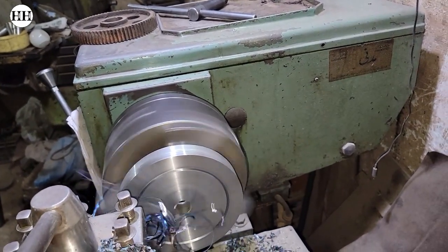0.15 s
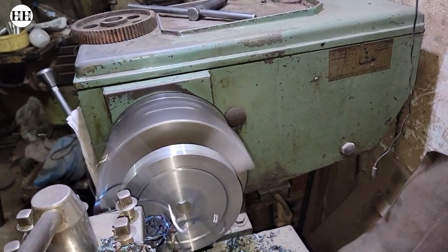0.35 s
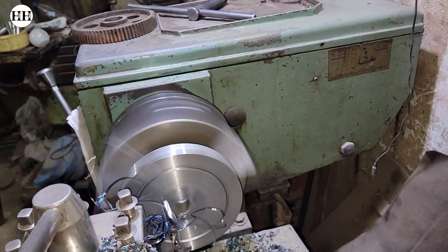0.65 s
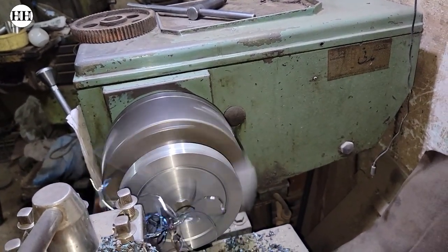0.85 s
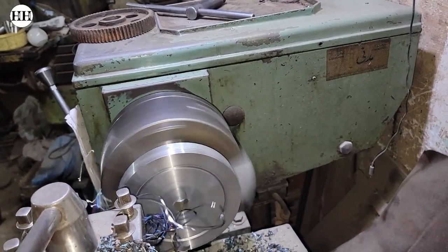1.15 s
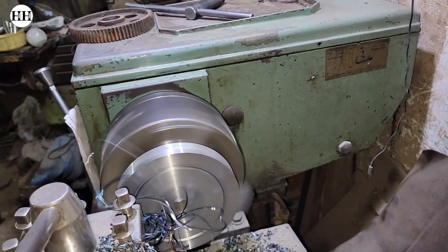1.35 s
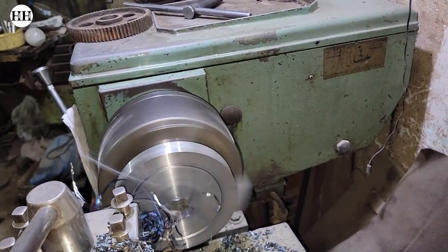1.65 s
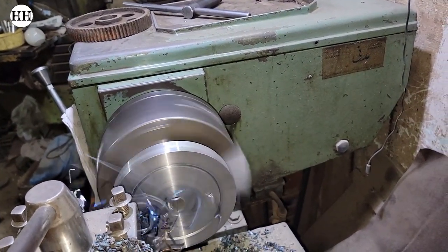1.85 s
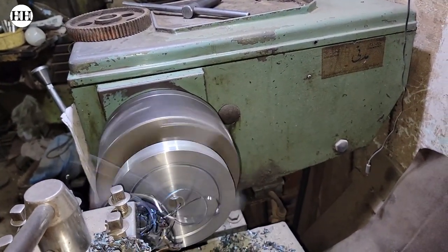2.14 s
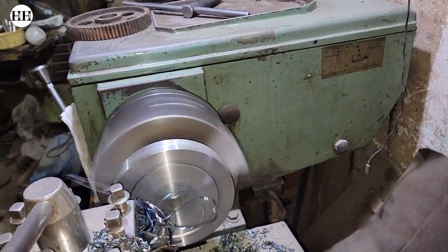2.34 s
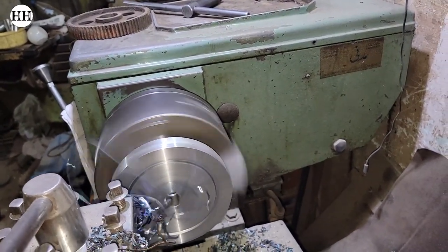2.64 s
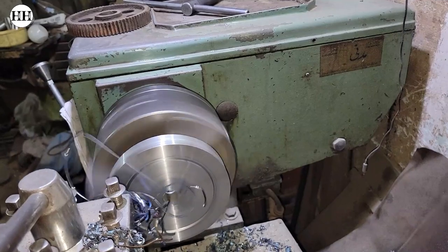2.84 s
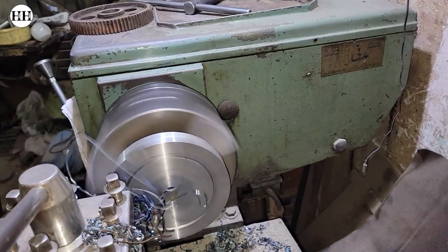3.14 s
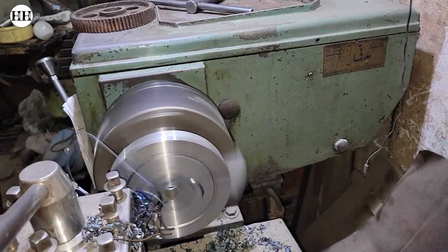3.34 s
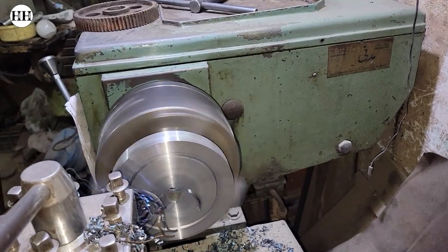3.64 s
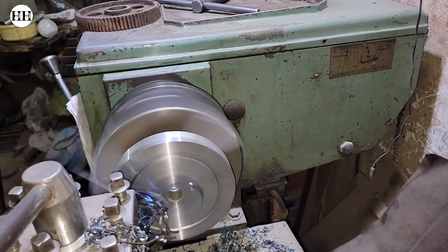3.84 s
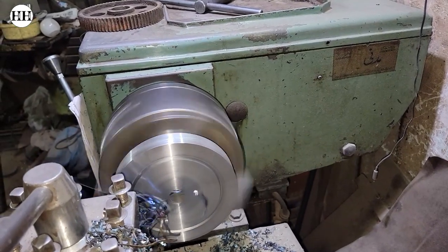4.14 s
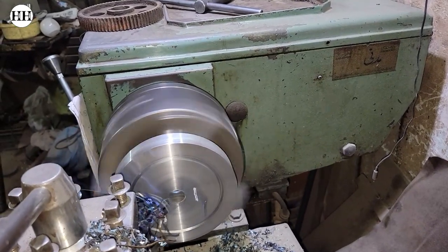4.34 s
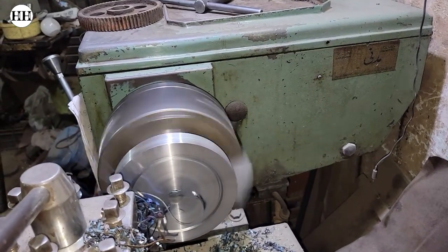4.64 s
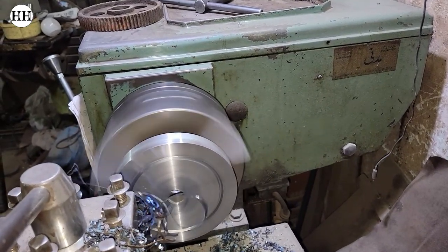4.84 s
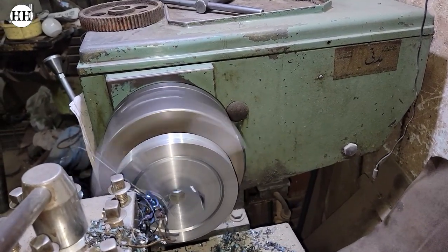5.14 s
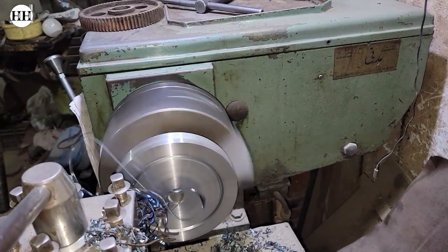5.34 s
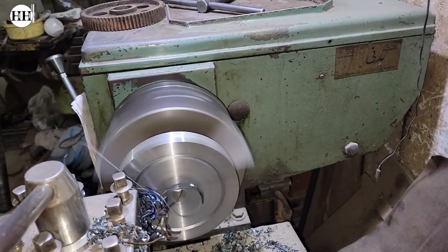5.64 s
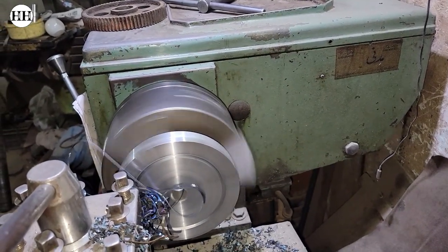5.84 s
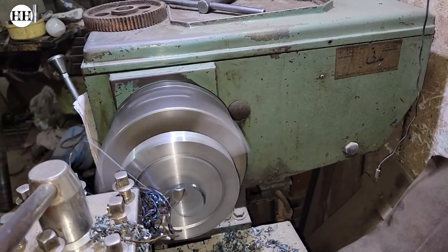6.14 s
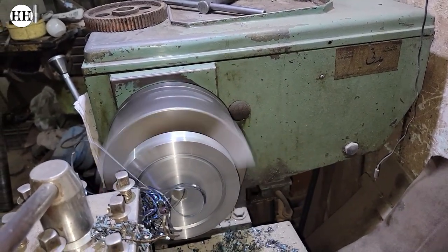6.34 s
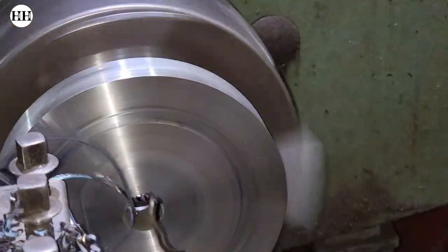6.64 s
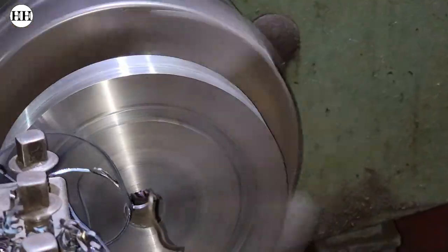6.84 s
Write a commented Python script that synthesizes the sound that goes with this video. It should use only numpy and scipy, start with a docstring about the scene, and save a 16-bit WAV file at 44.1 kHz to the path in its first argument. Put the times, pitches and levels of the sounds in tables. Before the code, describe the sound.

A lathe tool faces a spinning steel disc, heard closely in stereo with a short, dense workshop echo. From 0 s a harsh squeal around 4.5 kHz, with bright overtones, wobbles rapidly in pitch and level above low motor rumble, soft casing booms and a thin wavering gear whine near 3 kHz. It weakens unevenly, with a sharp spurt near 1.6 s. From 2 to 3.8 s it becomes a faint, rough tone while chip hiss, sizzle and gear noise swell; a tiny snap ticks at 3.3 s. It almost dies by 4.2 s, then shrieks back abruptly at 4.3 s, strongest, as the machine noise drops. Another tick comes near 5 s. After 5.6 s, with a low boom, the squeal breaks into gaps and chirps, one strong at 6.2 s. At about 6.5 s gearbox noise, hiss and sizzle jump louder until the end at 7 s, the squeal faint.

```python
"""A lathe tool facing a steel disc chatters in a wandering high squeal: a self-excited vibration of three
locked partials, which beats against its own echoes from bed and walls. The chip hisses and sizzles as
noise and sets the disc ringing; two snaps tick. Gears whine and drone as a wavering tone, noise and driven
resonances; motor and bed rumble below. Near the end gearbox noise, hiss and sizzle step up at once.
Two close microphones hear it, the left a little later."""
import sys
import numpy as np
from scipy import signal
from scipy.fft import rfft, irfft
from scipy.io import wavfile
from scipy.ndimage import uniform_filter1d

SR = 44100
rng = np.random.default_rng(int(sys.argv[2]) if len(sys.argv) > 2 else 0)


def int16_out(signal):
    """Quantize to a 16-bit WAV file."""
    q = np.round(np.clip(np.atleast_2d(signal).T, -1, 1) * 32767)
    wavfile.write(sys.argv[1], SR, q.astype(np.int16))


def boost(x):
    """Linear amplitude factor 10**(x/20) for a level x in decibels (scalar or array-like)."""
    u = np.asarray(x, float) / 20
    return 10 ** u


N = 307813   # length in samples
LEFT_LAG_S = .000385   # the machine is nearer to the right microphone


def rms_one(x):
    """Normalisation of a signal to unit root-mean-square."""
    return x / np.sqrt(np.mean(x ** 2) + 1e-20)


def in_time(rows):
    """Linear interpolation of every column after the time column, one value a sample."""
    s, *columns = np.transpose(rows)
    return [np.interp(np.arange(N) / SR, s, c) for c in columns]


def at_hz(points, hz):
    """Interpolation of a spectrum on a logarithmic frequency axis."""
    freqs, values = np.transpose(points)
    return np.interp(np.log(hz), np.log(freqs), values)


def drift(rate_hz):
    """Random modulation: low-passed noise of unit rms, its double real pole at rate_hz."""
    r = np.exp(-40 * np.pi * rate_hz / SR)   # one step is 20 samples
    noise = rng.standard_normal(N // 20 + 4002)
    slow = signal.lfilter([1], [1, -2 * r, r * r], noise)[4000:]   # settled part
    return np.interp(np.arange(N) / 20, np.arange(len(slow)), rms_one(slow))


def bumps(rows):
    """Superposition of flat-topped swells, each row (centre s, half length s, height)."""
    t = np.arange(N) / SR
    return sum(height * np.exp(-((t - s) / half_s) ** 4) for s, half_s, height in rows)


def two_ears(shared, own, hz):
    """Partial coherence: a shared part, later on the left, plus an independent part at each microphone."""
    # Each row: frequency in hertz, share of the power common to left and right (0 to 1).
    likeness = [(40, 0.89), (130, 1), (290, 0.46), (640, 0.69), (2000, 0.28), (5000, 0.043), (15000, 0.067)]
    alike = np.clip(at_hz(likeness, hz), 0, 1)
    common = np.array([np.roll(shared, round(LEFT_LAG_S * SR)), shared])
    return np.sqrt(alike) * common + np.sqrt(1 - alike) * own


def banded_noise(spectrum, patchy_db, rate_hz, per_octave=3):
    """Subband synthesis: narrow bands of stereo noise with common and separate flicker; total rms 1."""
    lowest, highest = spectrum[0][0], spectrum[-1][0]
    count = int(per_octave * np.log2(highest / lowest))
    edges = np.geomspace(lowest, min(highest, .45 * SR), count + 1)
    out, together = 0, drift(rate_hz)
    white = rng.standard_normal((2, 3, N))   # neighbouring bands take unrelated noise
    for k, (low, high) in enumerate(zip(edges, edges[1:])):
        band_pass = signal.butter(2, [low, high], "band", fs=SR, output="sos")
        band = signal.sosfilt(band_pass, white[k % 2])
        hz = np.sqrt(low * high)
        gain_db = at_hz(spectrum, hz) + patchy_db * (together + 3.06 * drift(35))
        out = out + boost(gain_db) * two_ears(band[0], band[1:], hz)
    return rms_one(out)


def rings(modes, throb_db):
    """Noise-driven resonance: noise twice through each narrow mode gives a rough, wavering tone."""
    out = 0
    for hz, width_hz, level_db in modes:
        r = np.exp(-np.pi * width_hz / SR)
        section = [1, 0, -1, 1, -2 * r * np.cos(2 * np.pi * hz / SR), r * r]
        tone = rms_one(signal.sosfilt([section, section], rng.standard_normal((3, N))))
        out = out + boost(level_db + throb_db * drift(8.9)) * two_ears(tone[0], tone[1:], hz)
    return out


def boom_envelope():
    """Amplitude envelope of the casing's booms."""
    # Each row: centre in seconds, half length in seconds, level in dB.
    boom_rows = [(0.0, 0.17, -41), (0.84, 0.47, -36), (3.677, 0.083, -40), (4.0, .07, -42),
                 (5.655, 0.077, -28.5), (6.845, .1, -37)]
    return bumps([(s, half_s, boost(db)) for s, half_s, db in boom_rows])


def rumble(booms):
    """Low broadband vibration of motor and bed, with two modes of the bed driven by noise."""
    # Each row: frequency in hertz, relative level in dB per hertz.
    rumble_spectrum = [(15, -48), (25, -26), (86, 1), (144, -11.5), (253, -6), (318, -5), (461, -7.5),
                       (598, -9), (648, -16.5), (1090, -9.5), (1200, -20), (1560, -58), (2640, -120)]
    # Each row: frequency in hertz, width in hertz, level in dB re the noise.
    bed_modes = [(55.5, 5, -7), (103.5, 23, -5)]
    noise = banded_noise(rumble_spectrum, patchy_db=0.66, rate_hz=7.1)
    return (boost(-37) + .45 * booms) * (noise + rings(bed_modes, throb_db=1.0))


def drone(booms):
    """Forced resonance of the casing: its modes swell in booms and hold steady for a while."""
    # Each row: frequency in hertz, width in hertz, relative level in dB.
    casing_modes = [(126.3, 55, -10), (214, 22, -7.5), (249.7, 12, -2), (286, 13, -8.5)]
    # Steady stretch: start in seconds, end in seconds, level in dB.
    steady = (4.0, 5.7, -39)
    from_s, to_s, held_db = steady
    t = np.arange(N) / SR
    held = boost(held_db) * (t > from_s) * (t < to_s)
    return np.maximum(boost(-43) + booms, held) * rings(casing_modes, throb_db=2.6)


def gearbox(level_db):
    """Structure-borne gear noise: shaped broadband noise and the gears' driven resonances."""
    # Each row: frequency in hertz, relative level in dB per hertz.
    gear_spectrum = [(88, -48), (150, -18), (247, -1.5), (336, -24.5), (542, -1), (622, -7.5), (846, -2),
                     (1860, -8), (2960, -11.5), (4940, -39), (9000, -77), (11700, -62), (19800, -120)]
    # Each row: frequency in hertz, width in hertz, level in dB re the noise.
    gear_modes = [(552.2, 25, -13), (882, 19, -13), (1337, 85, -12), (2259, 210, -14), (3822, 16, -13)]
    noise = banded_noise(gear_spectrum, patchy_db=0.76, rate_hz=48)
    return boost(level_db) * (noise + rings(gear_modes, throb_db=2.5))


def whine(level_db, chatter_db):
    """Gear-mesh tone, frequency and amplitude modulated by wheel run-out, with a phase drift on each path."""
    mesh_hz, waver_hz, throb_db = 2988, 8, 3.0
    # below -24 dB of chatter the unloaded gears whine louder, by up to 6.5 dB
    unloaded_db = 6.5 * np.clip((-24 - chatter_db) / 10, 0, 1)
    phase = 2 * np.pi * np.cumsum(mesh_hz + waver_hz * drift(22.9)) / SR
    paths = np.array([np.sin(phase + drift(15.0)) for path in range(3)])
    return boost(level_db + unloaded_db + throb_db * drift(22)) * two_ears(paths[0], paths[1:], mesh_hz)


def sizzle(level_db, third_partial_db):
    """Turbulent treble noise of the chip, plus the noisy part of the third partial's cutting force."""
    # Each row: frequency in hertz, relative level in dB per hertz.
    sizzle_spectrum = [(6000, -15.5), (8000, -2), (10500, -13.5), (11800, 0), (13200, 9), (15500, -1.5)]
    torn = boost(third_partial_db - 12)
    return (boost(level_db) + torn) * banded_noise(sizzle_spectrum, patchy_db=.45, rate_hz=14, per_octave=6)


def chip_hiss(level_db, chatter_db):
    """Broadband noise of the chip leaving the edge, with the disc's modes excited by noise."""
    # Each row: frequency in hertz, relative level in dB per hertz.
    chip_spectrum = [(2500, -9.5), (3300, -4), (4200, 1.5), (4600, -7.5), (4950, -6), (5250, -13),
                     (6500, -11), (7600, -16.5)]
    # Each row: frequency in hertz, width in hertz, level in dB re the hiss under full chatter.
    disc_modes = [(4185, 30, -14), (4320, 30, -14), (4400, 30, -14), (4515, 25, -10), (4605, 25, -9),
                  (4695, 25, -13), (4770, 16, -14)]
    hiss = banded_noise(chip_spectrum, patchy_db=.9, rate_hz=14, per_octave=8)
    shaken = boost(np.minimum(chatter_db + 27, 0))   # the disc rings less once the chatter dies
    return boost(level_db) * (hiss + shaken * rings(disc_modes, throb_db=3.0))


def ticks():
    """Impulsive fracture: each snap of a chip is high-passed noise with exponential decay."""
    # Each row: start in seconds, initial noise level in dB before the high-pass.
    snaps = [(3.3238, -18.5), (4.98, -18.5)]
    out, t = np.zeros((2, N)), np.arange(N) / SR
    for s, start_db in snaps:
        decay = (t >= s) * np.exp(-np.abs(t - s) / .012)   # time constant in s
        out += boost(start_db) * decay * rng.standard_normal((2, N))
    return signal.sosfilt(signal.butter(2, 10000, "high", fs=SR, output="sos"), out)


def layer_levels():
    """Level envelopes in dB of gearbox, whine, chip and sizzle: sinking, fixed final levels, and flares."""
    # Each row: time in seconds, sinking in dB.
    sink_rows = [(0.0, 11.5), (0.35, 14.5), (0.55, 8.5), (0.95, 10.5), (1.3, 9), (1.7, 4.5), (2.8, 0),
                 (4.28, 0.5), (4.35, 12.5), (5.55, 13.5), (5.8, 9.5), (6.22, 7), (6.48, 5)]
    # Each row: centre of a flare in seconds, half length in seconds, rise of the chip hiss in dB.
    spurts = [(0.96, 0.25, 5.5), (1.34, 0.044, 5), (1.59, .05, 4.5), (4.28, 0.032, 5.5), (5.64, 0.025, 3.5),
              (6.22, 0.063, 2.5)]
    # Levels in dB held after the step: gearbox, whine, chip, sizzle.
    final_levels = (-23.5, -41.5, -25.5, -29)
    step_s = 6.478
    # for each layer: level in dB when not sunk, share of the sinking, share of the flares
    layers = [(-27.5, 1.105, 0.54), (-35.5, 1.15, 0), (-27, 1, 1), (-34, 1, .9)]
    t, sink_db, flare_db = np.arange(N) / SR, in_time(sink_rows)[0], bumps(spurts)
    return [np.where(t < step_s, db - sink_share * sink_db, final_db) + flare_share * flare_db
            for (db, sink_share, flare_share), final_db in zip(layers, final_levels)]


def workshop(x):
    """Reverberation: bed and walls return a dense tail of even colour, a different one at each microphone."""
    t60_s = .35
    t = np.arange(SR // 2) / SR
    tail = rfft(rng.standard_normal((2, len(t))) * boost(-60 * t / t60_s) * (t > .002))
    smooth_power = uniform_filter1d(np.abs(tail) ** 2, size=25, axis=1)
    tail = irfft(tail / np.sqrt(smooth_power), len(t))
    lead = np.concatenate([x[SR // 4:0:-1], x])   # the squeal was sounding before
    return signal.fftconvolve(lead[None], tail, axes=1)[:, SR // 4:SR // 4 + N]


def chatter():
    """Self-excited vibration: its pitch and level, and each partial's level re the first."""
    # Each row: time in seconds, pitch in hertz, level in dB.
    squeal_rows = [(0.0, 4548, -15.5), (0.09, 4462, -14), (0.18, 4598, -13), (0.23, 4555, -17),
                   (0.28, 4604, -12.5), (0.37, 4455, -17), (0.45, 4495, -15), (0.49, 4446, -23.5),
                   (0.67, 4495, -17.5), (0.76, 4470, -18.5), (0.82, 4680, -18), (0.89, 4477, -16),
                   (0.97, 4514, -19.5), (1.08, 4517, -18), (1.14, 4510, -19), (1.24, 4660, -16.5),
                   (1.34, 4600, -23.5), (1.42, 4580, -23.5), (1.47, 4690, -18), (1.53, 4585, -24),
                   (1.59, 4462, -10.5), (1.67, 4610, -36), (1.7, 4650, -15), (1.83, 4467, -19.5),
                   (1.93, 4617, -19), (1.98, 4480, -21), (2.12, 4560, -21), (2.21, 4440, -26.5),
                   (2.34, 4545, -21.5), (2.45, 4546, -25.5), (2.98, 4554, -25.5), (3.56, 4585, -24.5),
                   (3.75, 4620, -27), (3.85, 4550, -37.5), (4.24, 4860, -49), (4.27, 4720, -26),
                   (4.288, 4750, -5.5), (4.34, 4580, -8.5), (4.44, 4628, -11.5), (4.59, 4548, -11),
                   (4.67, 4657, -13), (4.7, 4600, -9.5), (4.78, 4602, -14.5), (4.82, 4568, -13.5),
                   (4.97, 4512, -13), (5.06, 4552, -11.5), (5.12, 4455, -15.5), (5.19, 4520, -13.5),
                   (5.35, 4430, -16), (5.43, 4571, -13.5), (5.57, 4533, -16), (5.65, 4544, -22),
                   (5.73, 4537, -23), (5.81, 4790, -23), (5.88, 4550, -36), (5.97, 4720, -29),
                   (6.06, 4660, -42.5), (6.12, 4642, -20.5), (6.2, 4605, -13), (6.27, 4590, -30),
                   (6.35, 4570, -34.5), (6.41, 4630, -20), (6.47, 4556, -18.5), (6.52, 4620, -37),
                   (6.98, 4580, -28)]
    # How hard the edge grabs, at the usual pitch.
    # Each row: time in seconds, second partial in dB re the first, third partial in dB re the first.
    overtones = [(0.0, -4, -4), (0.4, -4, -9.5), (0.702, -10, -15), (1.101, -11, -18), (1.6, -14.5, -21),
                 (2.3, -21.5, -25), (4.269, -15.5, -8), (4.4, -14.5, -10.5), (5.351, -11, -14),
                 (5.6, -14.5, -18), (5.8, -19.5, -31.5), (6.98, -11.5, -32)]
    # Change of second and third partial in dB per 100 hertz of pitch above the usual.
    fade_per_100_hz = [-6.5, -3]
    usual_hz, wander_hz = 4530, 10
    pitch_hz, level_db = in_time(squeal_rows)
    pitch_hz = pitch_hz + wander_hz * drift(12.53)
    above = np.clip((pitch_hz - usual_hz) / 100, -1, 1.5)
    overtones_db = [db + fade * above for db, fade in zip(in_time(overtones), fade_per_100_hz)]
    return pitch_hz, level_db, [0] + overtones_db


def squeal(pitch_hz, level_db, partials_db):
    """Phase-locked harmonics of the chatter: each partial reaches the microphones directly and by echoes."""
    # Left minus right of each partial in dB: the tool beams them differently.
    partial_pan_db = [-1, 12, -1]
    # Echo of each partial in dB re its direct sound, by how the tool beams it.
    partial_echo_db = [3, -6, -3]
    jitter_hz, flutter_db, rasp = 23, 1.8, .18
    # the weaker the chatter, the more the cutting force knocks its pitch about, until it is a rough band
    lately_db = np.maximum(level_db, uniform_filter1d(level_db, size=SR // 5))
    knocked_hz = np.minimum(5 * boost(-5 * np.minimum(lately_db + 19, 0)), 200)
    shaken_hz = pitch_hz + jitter_hz * drift(71.9) + knocked_hz * drift(214)
    phase = 2 * np.pi * np.cumsum(shaken_hz) / SR
    flutter, direct, echoed = flutter_db * drift(40.0), 0, 0
    for k, rel_db in enumerate(partials_db):
        grit = 1 + rasp * drift(220)   # the chip tears in small jerks: noisy skirts round each partial
        share_db = -10 * np.log10(1 + boost(2 * partial_echo_db[k]))   # direct part of the whole level
        # 3 dB turns rms into sine amplitude; higher partials flutter more
        gain = boost(level_db + rel_db + share_db + 3 + (1 + k / 2) * flutter)
        partial = gain * grit * np.sin((k + 1) * phase)
        direct = direct + partial * boost(partial_pan_db[k] / 2 * np.array([[1], [-1]]))
        echoed = echoed + partial * boost(partial_echo_db[k])
    delayed = np.array([np.roll(direct[0], round(LEFT_LAG_S * SR)), direct[1]])
    return delayed + workshop(echoed)


def scene():
    """Superposition of all sources, the machine layers 1.6 dB louder on the right."""
    pitch_hz, chatter_db, partials_db = chatter()
    gearbox_db, whine_db, chip_db, sizzle_db = layer_levels()
    booms = boom_envelope()
    machine = rumble(booms) + drone(booms) + gearbox(gearbox_db) + whine(whine_db, chatter_db)
    machine = machine + chip_hiss(chip_db, chatter_db) + sizzle(sizzle_db, chatter_db + partials_db[2])
    tool = squeal(pitch_hz, chatter_db, partials_db)
    return tool + ticks() + machine * boost([[-.8], [.8]])


def roll_off(x):
    """The treble ends steeply here."""
    return signal.sosfilt(signal.butter(12, 15750, fs=SR, output="sos"), x)


def record(dry):
    """Soft saturation: peaks are rounded towards a ceiling of 0.82."""
    rounded = dry / (1 + (dry / .82) ** 8) ** (1 / 8)
    return roll_off(rounded)


dry = scene()
out = record(dry)
int16_out(out)
```